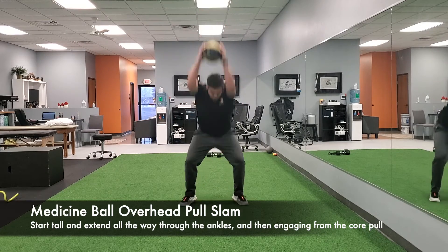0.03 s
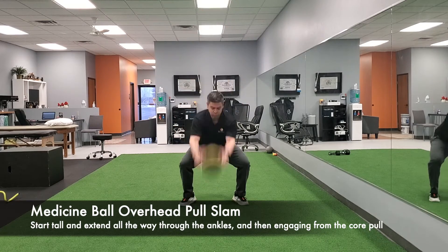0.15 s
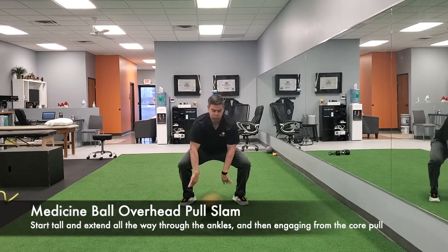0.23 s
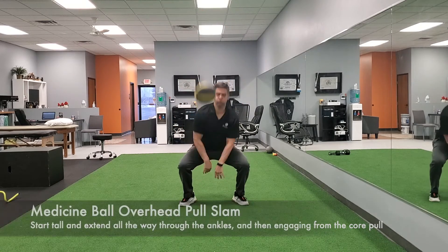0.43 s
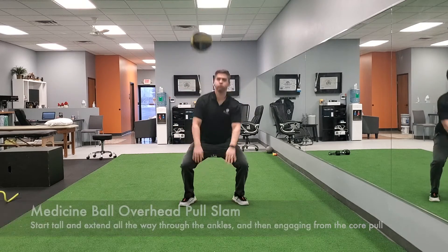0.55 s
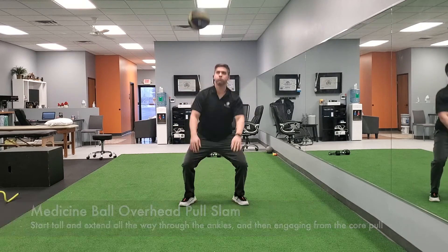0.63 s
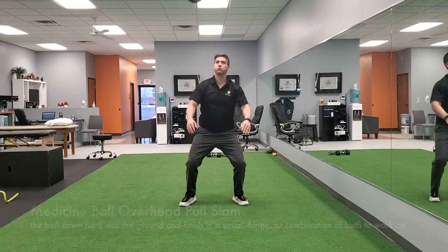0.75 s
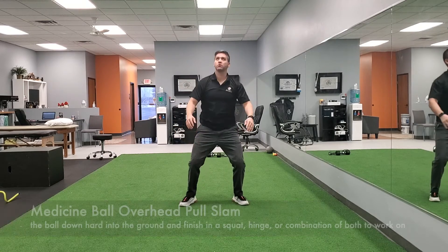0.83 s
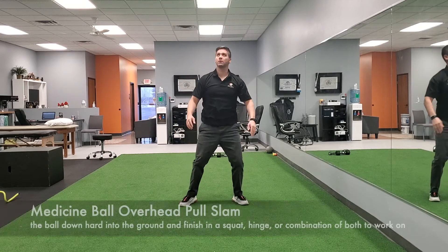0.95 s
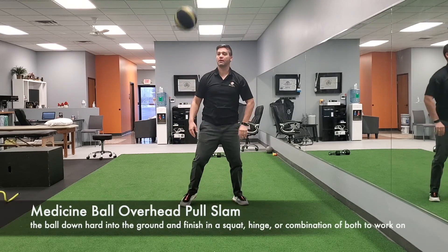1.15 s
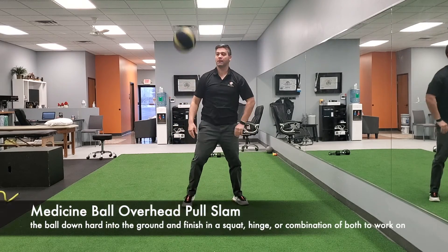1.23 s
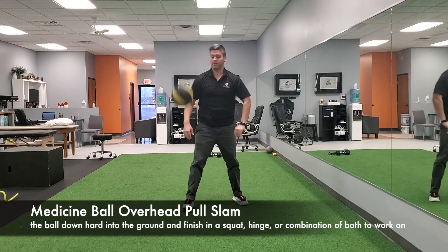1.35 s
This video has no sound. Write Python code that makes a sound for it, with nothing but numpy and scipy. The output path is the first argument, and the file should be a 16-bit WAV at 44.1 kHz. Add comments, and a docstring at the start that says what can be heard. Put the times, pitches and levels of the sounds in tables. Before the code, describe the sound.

A heavy medicine ball slams once onto turf at about 0.2 seconds, a sharp slap and deep thump together, just after a faint swish of clothing. The gym walls throw the blow back, and a low boom with a thin hiss dies away by about 1 second. Ventilation rumbles faintly throughout, all heard from a few metres away.

```python
"""A gym, the stereo microphone a few metres from where a heavy medicine ball is slammed once onto turf.
The skin slaps, the shell knocks and the floor thumps; walls throw the blow back and the room booms.
A thin hiss lingers after it, clothes swish with the throw, and ventilation rumbles faintly behind."""
import sys
import numpy as np
from scipy import signal
from scipy.fft import rfft, irfft
from scipy.io import wavfile

SR = 44100
rng = np.random.default_rng(int(sys.argv[2]) if len(sys.argv) > 2 else 0)


def to_wav(sig):
    """Store sig (one row per channel, or 1-D mono) as 16-bit WAV at the path in sys.argv[1].

    Samples outside -1..1 are clipped; the rate is SR.
    """
    pcm = np.clip(np.atleast_2d(sig), -1, 1) * 32767
    pcm = np.round(pcm).astype(np.int16)
    wavfile.write(sys.argv[1], SR, pcm.T)  # frames by channels


N = 61739
T, HZ = np.arange(N) / SR, np.fft.rfftfreq(N, 1 / SR)
SLAM_S = 0.2298
SLAP_S = SLAM_S + 0.0007

# spectrum of the skin striking turf: (frequency [Hz], relative level [dB])
SLAP_SPECTRUM = [(200, 12.5), (600, -6), (1100, -0.5), (2000, 0), (3200, -9), (5500, -19.5), (7600, -17),
                 (9500, -28.5), (16000, -43)]
# floor modes, lower then upper: (frequency [Hz], level [dB], t60 [s], rise [s], lag [s])
FLOOR_MODES = [(54, 2.5, 0.11, 0.018, 0.0054), (102.5, 1, 0.048, 0.014, 0.00898)]


def skin_slap():
    """The skin hits the turf: one sharp click, its energy packed at the front (minimum phase)."""
    log_gain = np.log(amp(read(SLAP_SPECTRUM, abs(np.fft.fftfreq(N, 1 / SR)))))
    click = np.fft.ifft(np.exp(np.conj(signal.hilbert(log_gain)))).real
    return -amp(6) * delay(click, SLAP_S)


def shell_knock():
    """The ball's shell rings briefly in a few damped modes."""
    # (frequency [Hz], level [dB], t60 [s], rise [s], lag [s])
    shell_modes = [(333, 11, 0.02, 0.0033, 0.0005), (545, -14.5, .12, 0.0031, .002),
                   (773, -15.5, 0.044, 0.0015, 0)]
    return sum(mode(*row) for row in shell_modes)


def floor_thump():
    """The floor gives a deep thump as the ball flattens."""
    return sum(mode(*row) for row in FLOOR_MODES)


def turf():
    """A soft scuff just before the full blow, then a brief crunch as the fibres are crushed."""
    crunch_s, scuff_at_s, scuff_width_s, scuff_hz = 0.0051, 0.2268, 0.0017, 685
    age = T - SLAP_S
    crunch = noise(read(SLAP_SPECTRUM, HZ)) * (age > 0) * np.exp(-abs(age) / crunch_s)
    scuff = noise(-18 * abs(np.log2((HZ + 1) / scuff_hz)))  # 18 dB per octave down on both sides
    scuff /= np.cosh(np.clip((T - scuff_at_s) / scuff_width_s, -20, 20))
    return amp(-16.5) * crunch + amp(-21) * scuff


def echoes(slap, knock):
    """Walls and ceiling return a dulled slap and the knock; the upper thump comes back in clumps."""
    # (delay [s], slap level [dB], knock level [dB], right channel lag [s])
    reflections = [(.0055, -9, -24, 0.019), (0.0101, -30, -15, 0.0055), (0.0232, -3, -31, 0.02),
                   (0.0243, -14, -31, 0.019), (0.0324, -5, -15, -0.024), (0.0374, -12, -13.5, -0.0076),
                   (0.0476, -11, -13.5, 0), (0.081, -25, -29, 0.015), (0.092, -23, -13.5, -.0001),
                   (0.121, -27, -14, 0), (.155, -14, -15.5, -0.0052)]
    # returns of the thump between the walls: (delay [s], level [dB])
    thump_returns = [(.038, 6.5), (0.111, -2.5), (.157, -11), (0.197, -3.5)]
    wall_cutoff_hz = 3460
    pole = np.exp(-2 * np.pi * wall_cutoff_hz / SR)
    dull_slap = signal.lfilter([1 - pole], [1, -pole], slap)
    upper_thump = mode(*FLOOR_MODES[1])
    out = np.zeros((2, N))
    for delay_s, slap_db, knock_db, right_lag_s in reflections:
        echo = amp(slap_db) * dull_slap + amp(knock_db) * knock
        out += [delay(echo, delay_s), delay(echo, delay_s + right_lag_s)]
    return out + sum(amp(db) * delay(upper_thump, delay_s) for delay_s, db in thump_returns)


def room_boom():
    """Standing waves and a diffuse tail fill the gym, each band dying at its own speed."""
    # (frequency [Hz], level [dB], t60 [s])
    standing_waves = [(85, -20, 0.64), (100.6, -12.5, 0.83), (130.5, -17.5, 0.81), (221.4, -22, 0.86),
                      (262, -30.5, 1), (302.3, -23, 0.78), (320, -25.5, .55), (359, -29, 0.446),
                      (390, -27.5, 0.8)]
    # diffuse reverberation: (frequency [Hz], relative level [dB], t60 [s])
    tail_bands = [(30, -23, 0.98), (53.3, -5.5, 0.77), (120, -7, 1), (174, -18.5, 1), (241.4, -1.5, 0.83),
                  (380, -5, 0.79), (472, -10.5, 0.62), (710, -13.5, 0.42), (926, -23, 0.46),
                  (2110, -30, 0.46), (3700, -42.5, 1), (7340, -48, 0.8), (16000, -70, 0.5)]
    tail_rise_s = 0.012
    hz, frame_s, bands = signal.stft(noise(read(tail_bands, HZ)), SR, nperseg=1024)
    t60 = read(tail_bands, hz, column=2)[:, None]
    bands *= amp(-60 * np.maximum(frame_s - SLAM_S, 0) / t60)
    tail = signal.istft(bands, SR, nperseg=1024)[1][:, :N]
    tail *= 1 - np.exp(-np.maximum(T - SLAM_S, 0) / tail_rise_s)
    return amp(-12.5) * tail + sum(mode(hz, db, t60, rise_s=0.023) for hz, db, t60 in standing_waves)


def hiss():
    """A thin hiss hangs on after the blow; its treble fades first."""
    # (frequency [Hz], relative level [dB])
    spectrum = [(500, 6.5), (1000, 4.5), (1500, 2.5), (2150, -1.5), (2700, -4.5), (4200, -4), (5000, -7.5),
                (6800, -5), (8700, -11), (12000, -12), (15500, -6)]
    # swell and fade: (time [s], lower band gain [dB], treble gain [dB])
    envelope = [(.23, -74, -77), (.29, -43, -36.5), (.42, -40.5, -41), (.55, -42.5, -46.5),
                (0.701, -45.5, -55.5), (.80, -54, -64.5), (.92, -60, -71)]
    sound = noise(read(spectrum, HZ))
    lower = lowpass(sound, hz=3700)
    treble = sound - lower
    times, lower_db, treble_db = np.transpose(envelope)
    lower *= amp(np.interp(T, times, lower_db, left=-np.inf))
    treble *= amp(np.interp(T, times, treble_db, left=-np.inf))
    return lower + treble


def hiss_rings():
    """Faint fuzzy rings swell, slide in pitch and fade inside the hiss."""
    # (frequency [Hz], width [Hz], level [dB], pitch fall [Hz/s], peak time [s], half length [s])
    rings = [(2190, 510, -49.5, 8, 0.515, 0.053), (3305, 73, -50, -2, 0.35, 0.17),
             (5736, 200, -53, 588, 0.37, 0.15)]
    start_s, rise_s = 0.242, 0.028
    out = np.zeros((2, N))
    for hz, width, db, fall, peak_s, half_s in rings:
        glide = np.exp(-1j * np.pi * fall * (T - peak_s) ** 2)
        band = (signal.hilbert(narrow_noise(hz, width)) * glide).real
        out += band * amp(db) * swell(peak_s, half_s)
    return out * np.clip((T - start_s) / rise_s, 0, 1)


def clothes():
    """Fabric swishes with each quick move; the last swish squeaks a little."""
    # (peak time [s], half length [s], level [dB], tilt above 500 Hz [dB/octave])
    moves = [(0.084, 0.059, -52.5, -1), (0.193, 0.038, -49, 10), (0.202, 0.039, -53, -3),
             (1.197, 0.024, -69.5, 0)]
    # rubbing fabric: (frequency [Hz], relative level [dB])
    spectrum = [(300, -2.5), (1000, 3.5), (3000, 1.5), (6200, -3.5), (7600, -6), (9000, -11.5),
                (16000, -10)]
    # (frequency [Hz], width [Hz], level [dB])
    squeak_bands = [(3280, 900, -70.5), (4650, 510, -76)]
    octaves = np.log2(np.maximum(HZ, 500) / 500)
    swishes = [noise(read(spectrum, HZ) + tilt * octaves) * amp(db) for _, _, db, tilt in moves]
    swishes[-1] += sum(amp(db) * narrow_noise(hz, width) for hz, width, db in squeak_bands)
    return sum(swish * swell(peak_s, half_s) for swish, (peak_s, half_s, _, _) in zip(swishes, moves))


def ventilation():
    """Room tone: the low rumble and airy noise of the ventilation, slowly easing."""
    # (frequency [Hz], relative level [dB])
    spectrum = [(20, -21), (38, -12.5), (60, -3), (105, -6), (135, -14), (190, -18.5), (250, -19.5),
                (400, -23.5), (800, -21), (1150, -31.5), (1800, -37), (4500, -92), (7300, -68),
                (16000, -92)]
    start_db, fall_db_per_s = -42, 5.5
    return noise(read(spectrum, HZ)) * amp(start_db - fall_db_per_s * T)


def mode(hz, db, t60, rise_s, lag_s=0):
    """One mode that swells after the blow and dies away."""
    age = np.maximum(T - SLAM_S - lag_s, 0)
    envelope = amp(db - 60 * age / t60) * (1 - np.exp(-age / rise_s))
    return -envelope * np.sin(2 * np.pi * hz * age)


def noise(spectrum_db):
    """Diffuse stereo noise at an rms of 1 with the given spectrum, nearly mono in the bass."""
    # likeness of the two channels: (frequency [Hz], correlation [0-1])
    stereo_likeness = [(50, .998), (150, 0.98), (300, 0.82), (600, 0.58), (1100, 0.15), (4000, 0.19),
                       (16000, 0.23)]
    likeness = read(stereo_likeness, HZ)
    mid, side = np.exp(2j * np.pi * rng.random((2, len(HZ))))
    mid, side = mid * np.sqrt(1 + likeness), side * np.sqrt(1 - likeness)
    sound = irfft(np.array([mid + side, mid - side]) * amp(spectrum_db), N)
    return sound / np.sqrt(np.mean(sound ** 2) + 1e-20)


def narrow_noise(hz, width):
    """Noise in one resonance."""
    return noise(-20 * np.log10(1 + (2 * (HZ - hz) / width) ** 2))


def swell(peak_s, half_s):
    """A bell-shaped rise and fall."""
    return np.exp(-0.5 * ((T - peak_s) / half_s) ** 2)


def amp(db):
    """Decibels to gain."""
    return 10 ** (np.asarray(db) / 20)


def read(points, hz, column=1):
    """Reads one column of a table on a log-frequency axis."""
    table = np.array(points, float)
    return np.interp(np.log(hz + 1), np.log(table[:, 0] + 1), table[:, column])


def delay(x, seconds):
    """Makes a sound arrive later."""
    return np.interp(T - seconds, T, x, left=0)


def lowpass(x, hz):
    """Keeps what lies below hz."""
    return irfft(rfft(x) / (1 + (HZ / hz) ** 6), N)


def scene():
    """The slam and the gym around it, heard from a few metres away and slightly to the left."""
    low_cut_hz, lean_db = 42, 0.75
    slap, knock = skin_slap(), shell_knock()
    slam = slap + knock + floor_thump() + echoes(slap, knock) + turf() + room_boom()
    slam = signal.lfilter(*signal.butter(2, low_cut_hz, "high", fs=SR), slam)
    mix = slam + hiss() + hiss_rings() + clothes() + ventilation()
    return mix * amp([[lean_db], [-lean_db]])


def record(dry):
    """The microphone has a dip in its treble; peaks round off at full scale and the very top is cut."""
    dip_hz, dip_width_hz, dip_db, top_hz = 7620, 780, -10, 15900
    response = amp(dip_db * np.exp(-((HZ - dip_hz) / dip_width_hz) ** 2))
    heard = irfft(rfft(dry) * response, N)
    rounded = heard / (1 + heard ** 8) ** (1 / 8)
    band_limit = signal.firwin(511, top_hz, window=("kaiser", 9), fs=SR)
    return signal.oaconvolve(rounded, band_limit[None], "same")


dry = scene()
out = record(dry)
to_wav(out)
```